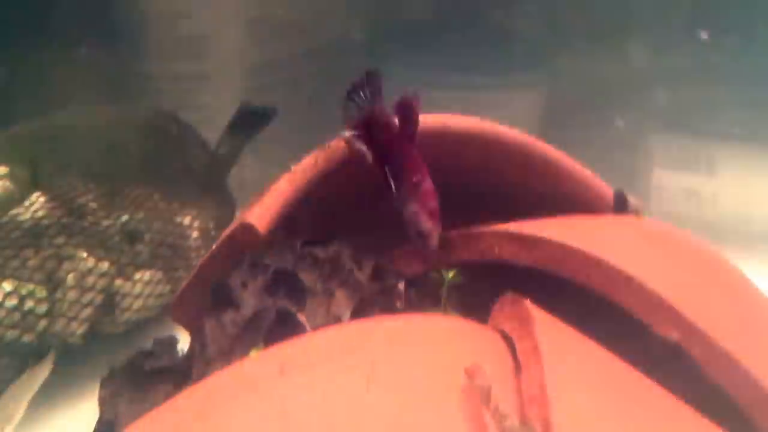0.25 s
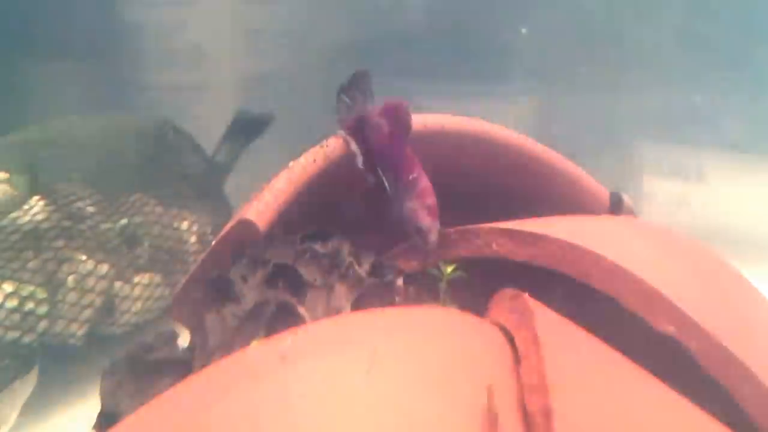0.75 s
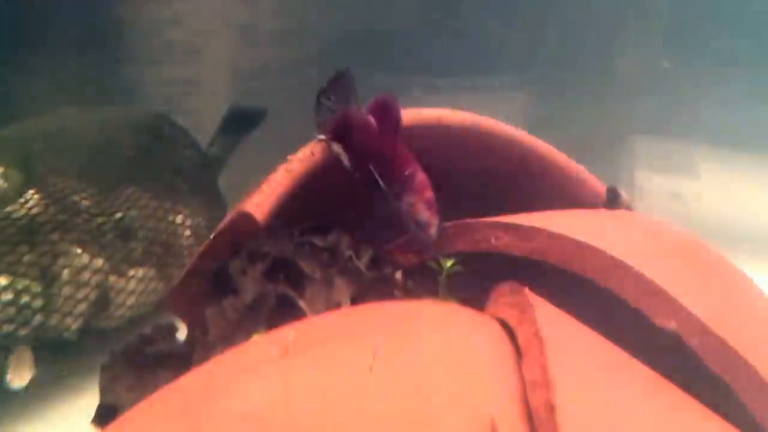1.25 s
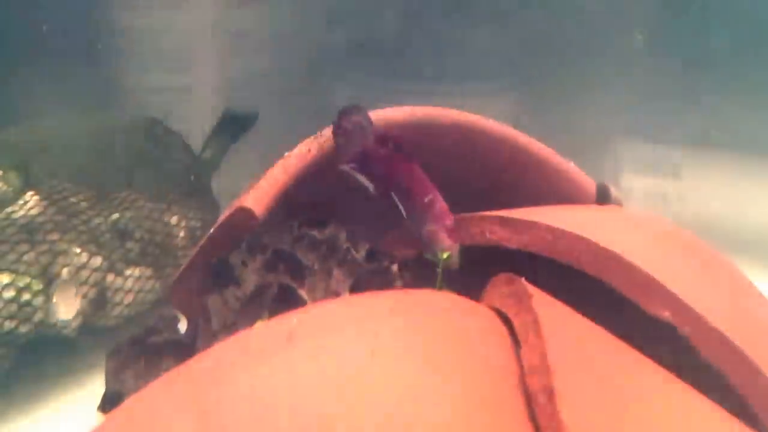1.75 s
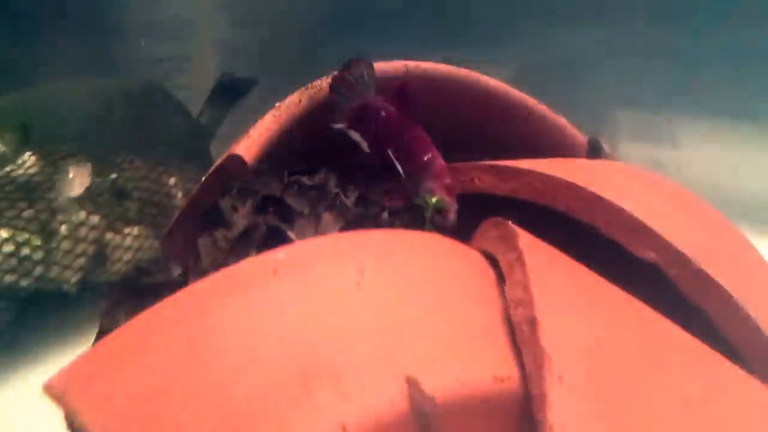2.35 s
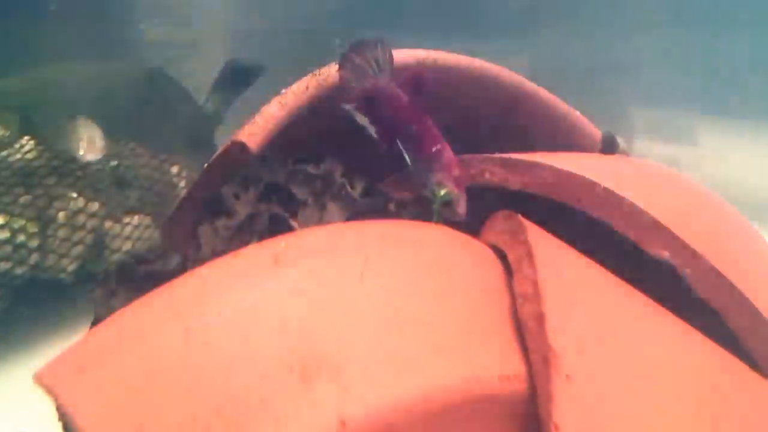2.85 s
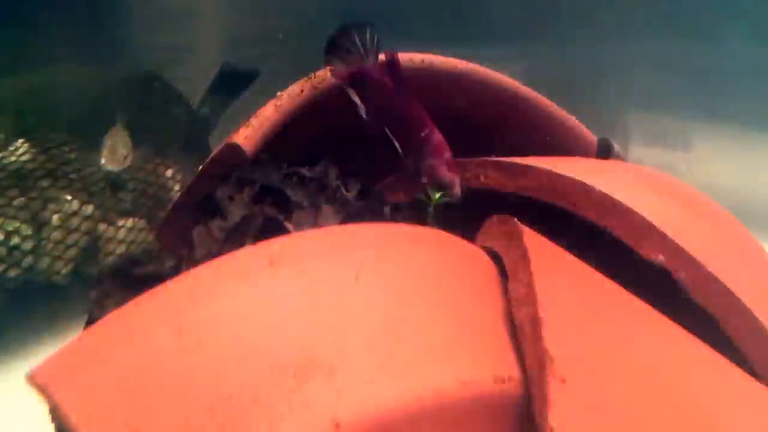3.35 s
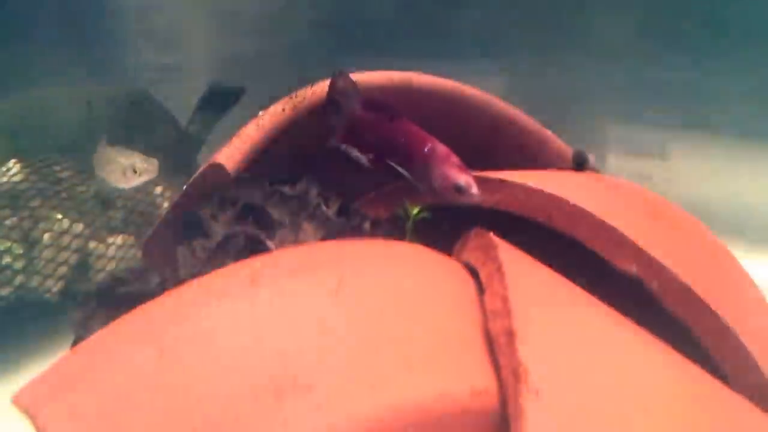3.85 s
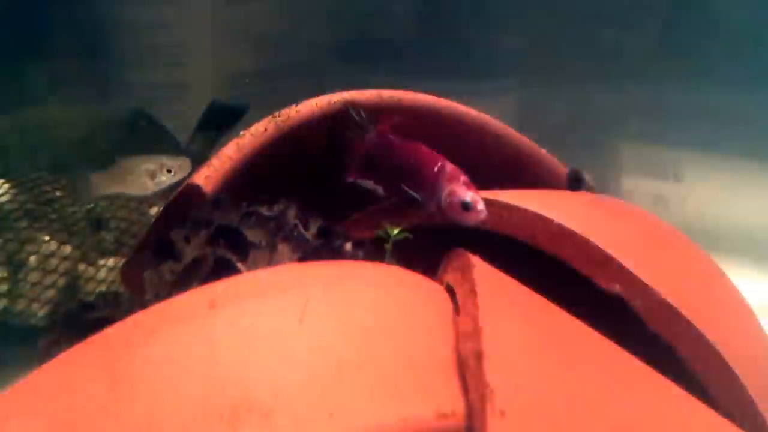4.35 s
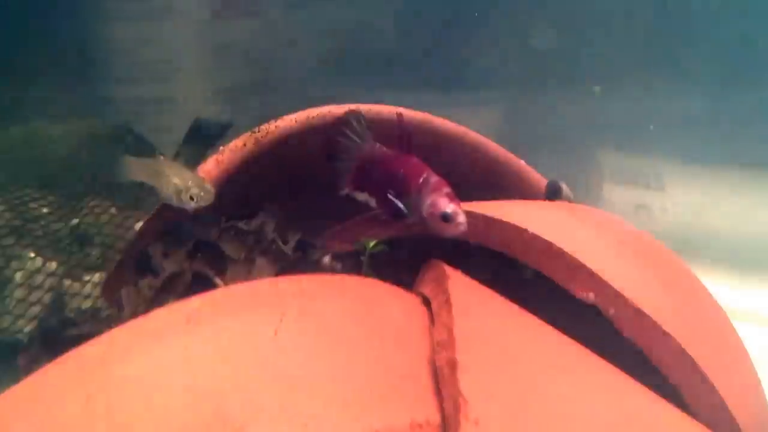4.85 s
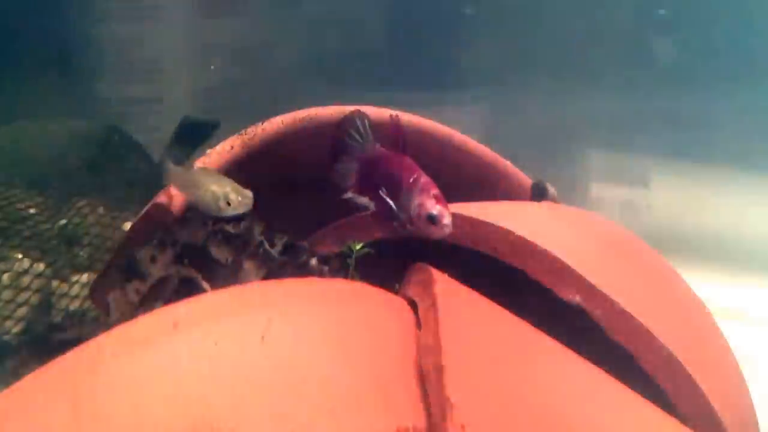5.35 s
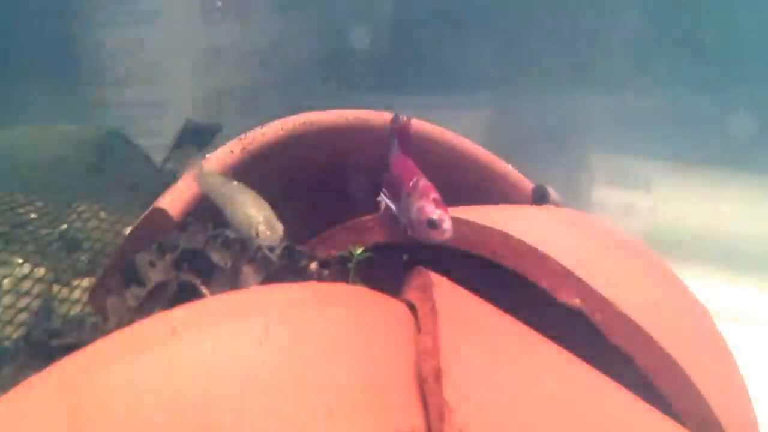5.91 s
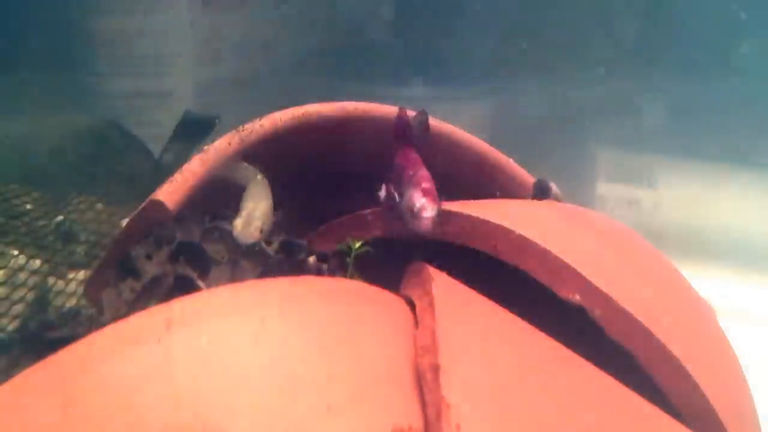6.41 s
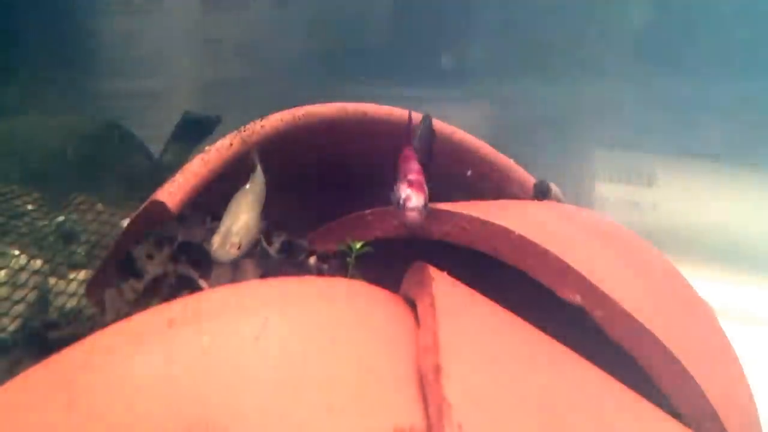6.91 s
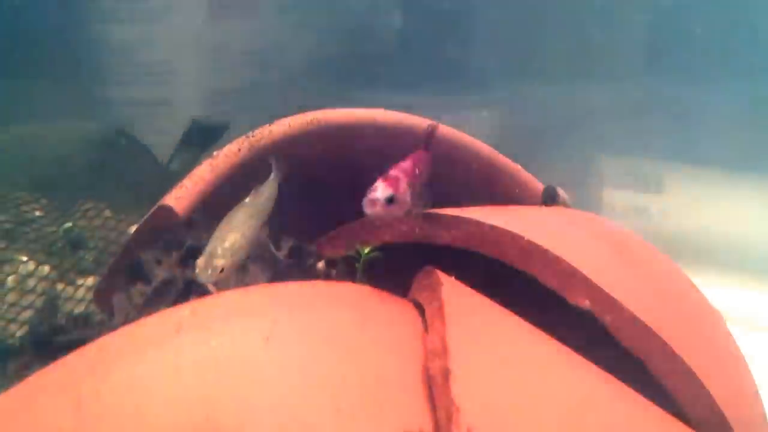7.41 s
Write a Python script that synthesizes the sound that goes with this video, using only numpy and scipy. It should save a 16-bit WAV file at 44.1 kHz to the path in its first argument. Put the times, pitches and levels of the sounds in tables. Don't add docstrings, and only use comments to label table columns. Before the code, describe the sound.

A fish tank in a quiet room, heard close to the glass. From 0 s to the end at about 7.6 s, an air pump gives a deep, steady mains-like hum with a thin buzz above it. Air rising through the water makes a low, uneven rumble and gurgle, surrounded by a soft wash and very faint high fizz. Bubble plops start at about 0.2 s, mostly low and round, some higher, scattered irregularly. The valve's bright rattle flutters about six times a second, fairly even at first, then abruptly throbs more strongly from 2.3 s. Tiny bursts of hissing spray come and go. Several plops crowd together near 5.1 s. Around 6 s the throb flattens into a steadier buzz, then pulses more clearly again from about 7 s, with a few faint high plops near 7.2 to 7.4 s. The hum never stops.

```python
import sys
import numpy as np
from scipy import signal
from scipy.fft import rfft, irfft, next_fast_len
from scipy.io import wavfile
from scipy.ndimage import uniform_filter1d

SR = 44100
rng = np.random.default_rng(int(sys.argv[2]) if len(sys.argv) > 2 else 0)


def dump_mix(stems):
    frames = np.atleast_2d(stems).T
    limited = np.clip(frames, -1, 1)
    pcm = np.round(limited * 32767).astype(np.int16)
    wavfile.write(sys.argv[1], SR, pcm)


def boost_factor(decibels):
    exponent = np.asarray(decibels, float) / 20
    return 10 ** exponent


N = 338247

STROKE_HZ, FIRST_STROKE_S = 59.9936, .0065
# t/s, f/Hz, peak level/dB
PLOPS = [(0.232, 5800, -47), (0.529, 780, -45.5), (0.598, 1480, -44), (0.728, 2690, -48),
         (0.737, 1010, -41), (1.127, 885, -51), (1.709, 775, -51), (1.773, 815, -40), (1.988, 810, -44),
         (2.084, 996, -46), (3.171, 1080, -48), (3.248, 540, -47.3), (3.659, 1294, -42.5),
         (3.786, 2690, -50.5), (4.295, 4220, -49.5), (4.775, 1095, -41.5), (4.996, 570, -46.5),
         (5.094, 1693, -43.5), (5.101, 913, -48), (5.11, 1360, -47.5), (5.121, 2035, -45.5),
         (5.322, 3080, -49.5), (5.483, 855, -48), (6.013, 1860, -45.5), (6.321, 2030, -47.5),
         (6.71, 860, -58), (7.061, 826, -49), (7.196, 3290, -54), (7.339, 3270, -55), (7.408, 3200, -52)]


def housing_hum():
    # multiple of the stroke rate, rms level/dB
    hum_partials = [(1.0, -32.4), (2.0, -33.4), (3.0, -44.9), (4.0, -52.9), (5.0, -51.8), (6.0, -52.8),
                    (7.0, -70.9), (8.0, -61.7), (9.0, -68.8), (10.0, -57.7), (11.0, -69.8), (12.0, -81.3),
                    (13.0, -79.6), (14.0, -73.8), (15.0, -70.6), (16.0, -68.9), (17.0, -68.0),
                    (18.0, -73.9), (19.0, -78.6), (20.0, -62.3), (21.0, -70.8), (22.0, -77.7),
                    (23.0, -73.3), (24.0, -75.3), (25.0, -70.9), (26.0, -71.8), (27.0, -70.9),
                    (28.0, -65.5), (29.0, -76.0), (30.0, -68.8)]
    return boost_factor(-0.04) * harmonics(hum_partials, wander_db=0.4, wander_rad=0.027, rate_hz=0.62)


def harmonics(partials, wander_db, wander_rad, rate_hz):
    stroke_phase = 2 * np.pi * STROKE_HZ * (np.arange(N) / SR - FIRST_STROKE_S)
    out = np.zeros(N)
    for multiple, db in partials:
        start = rng.uniform(0, 2 * np.pi) * (multiple > 3)
        loose = np.sqrt(multiple)
        level = np.sqrt(2) * boost_factor(db + wander_db * loose * drift(rate_hz))
        phase = multiple * stroke_phase + start + wander_rad * loose * drift(rate_hz)
        out -= level * np.cos(phase)
    return out


def valve():
    # multiple of the stroke rate, rms level/dB
    buzz_partials = [(41.0, -79.1), (42.0, -77.5), (46.0, -77.3), (48.0, -73.3), (49.0, -75.6),
                     (51.0, -77.2), (52.0, -76.1), (56.0, -83.5), (58.0, -85.5), (59.0, -87.4),
                     (61.0, -82.8), (71.0, -81.4), (75.0, -78.1), (78.0, -79.3), (79.0, -72.9),
                     (80.0, -80.6), (81.0, -82.7), (83.0, -76.4), (86.0, -78.2), (87.0, -73.1),
                     (88.0, -74.7), (89.0, -73.8), (90.0, -77.3), (91.0, -80.7), (92.0, -75.9),
                     (94.0, -76.2), (95.0, -80.4), (96.0, -78.3), (97.0, -77.4), (98.0, -80.2)]
    # f/Hz, density level/(dB per Hz)
    rattle_spectrum = [(3500, -78), (4200, -7), (4700, -2.5), (5200, -1.5), (5800, -3.5), (6100, -11),
                       (7000, -31), (7600, -70)]
    # f/Hz, density level/(dB per Hz)
    clatter_spectrum = [(1800, -103), (2000, -93), (2400, -98), (3100, -98), (3600, -108), (4100, -104),
                        (4500, -112), (6000, -113), (7200, -112), (7900, -124)]

    beat = 1 + 0.054 * np.cos(4 * np.pi * STROKE_HZ * np.arange(N) / SR)
    habit = repeating(memory=40)
    slaps = swarm(1024, 2.5)
    slaps = slaps / slaps.std() + .45 * habit / habit.std()
    rattle = boost_factor(-89.5) * beat * patchy_noise(rattle_spectrum, 1.0, 23.0, 0.26, source=slaps)

    upper_partials = [row for row in buzz_partials if row[0] > 65]
    lower_partials = [row for row in buzz_partials if row[0] <= 65]
    upper = harmonics(upper_partials, wander_db=.2, wander_rad=.08, rate_hz=.4)
    lower = harmonics(lower_partials, wander_db=.3, wander_rad=.05, rate_hz=.3)
    clatter = patchy_noise(clatter_spectrum, .5, 2, .5, source=repeating(memory=60))
    return throbbing() * (rattle + boost_factor(1.0) * upper) + lower + clatter


def throbbing():
    # t/s, swell level over the steady rattle/dB, steady rattle level/dB
    looseness = [(0.0, -6, 1.5), (0.9, -2, -.5), (2.2, -3, -.5), (2.32, 15, -9.5), (2.7, 7, -5),
                 (3.45, 9, -5.5), (3.9, 3, -3.5), (5.4, 8, -5.5), (6.0, -1, -1), (6.7, -1, -.5),
                 (7.2, 6, -5), (7.67, 4, -2.5)]
    first_s, throbs_per_s, quicken_per_s2 = .042, 6.31, .035
    uneven_db, uneven_s = .7, .004

    clock = np.arange(N) / SR
    beats = np.arange(50)
    uneven = rng.standard_normal((len(beats), 2))
    throb_count = (throbs_per_s + .5 * quicken_per_s2 * (clock + first_s)) * (clock - first_s)
    throb_s = np.interp(beats, throb_count, clock)
    when, swell_db, steady_db = np.transpose(looseness)
    peak_db = np.interp(throb_s, when, swell_db) + uneven_db * uneven[:, 0]
    throb = 2 + swells(throb_s + uneven_s * uneven[:, 1], peak_db, rise_s=.026, fall_s=.030)
    throb = throb * boost_factor(np.interp(clock, when, steady_db))
    return throb / np.sqrt(np.mean(throb ** 2))


def repeating(memory):
    stroke = round(SR / STROKE_HZ)
    fresh = rng.standard_normal((N // stroke + 200, stroke))
    strokes = signal.lfilter([1], [1, 1 / memory - 1], fresh, axis=0)
    return strokes[150:].ravel()[:N]


def rumble():
    # f/Hz, density level/(dB per Hz)
    shudder_spectrum = [(15, -74), (30, -78), (45, -71), (60, -66.5), (90, -67), (120, -61.5), (145, -70.5),
                        (190, -87)]
    # f/Hz, density level/(dB per Hz)
    glass_spectrum = [(120, -91), (155, -64), (200, -60.5), (235, -64), (270, -61.5), (310, -66),
                      (350, -68), (420, -86.5)]
    gain = boost_factor(1.32 * air_flow_db() + 1.28 * drift(2.1))
    return patchy_noise(shudder_spectrum, .8, 5, .1) + gain * patchy_noise(glass_spectrum, 1.0, 21, 1.0)


def gurgle():
    # f/Hz, density level/(dB per Hz)
    gurgle_spectrum = [(300, -86.5), (360, -70), (420, -78), (480, -80), (550, -81.5), (680, -89),
                       (900, -100)]
    low_plops = [(s, db) for s, hz, db in PLOPS if hz < 1150]
    when, pocket_db = np.transpose(low_plops)
    pockets = 1 + swells(when, pocket_db + 39.5, rise_s=.025, fall_s=.025)
    gain = pockets * boost_factor(0.61 * air_flow_db() + 3.0 * drift(3.4))
    return gain * patchy_noise(gurgle_spectrum, 1.2, 8.6, 0.82, source=swarm(2048, 2.4))


def air_flow_db():
    # t/s, level/dB
    flow = [(0.0, -39), (1.26, -42.5), (1.32, -38), (1.98, -42), (3.1, -40), (3.14, -35.5), (3.18, -41),
            (4.51, -41.5), (5.0, -43.5), (5.23, -37.5), (5.79, -42.5), (5.92, -38), (6.58, -43.5),
            (6.81, -38), (7.11, -42.5), (7.24, -39.5), (7.46, -42), (7.67, -37.5)]
    s, db = np.transpose(flow)
    return np.interp(np.arange(N) / SR, s, db - db.mean())


def bubbles():
    climb_hz_s = 3000
    out = np.zeros(N)
    clusters = rng.standard_normal((len(PLOPS), 9, 3))
    for (s, hz, db), mates in zip(PLOPS, clusters):
        add_bubble(out, s - .003, hz, db - hz / 1200, climb_hz_s, .010)
        for late, detune, size in mates:
            mate_hz = hz + (110 + .06 * hz) * detune
            mate_db = db - 6.5 - hz / 1500 + 2.5 * size
            add_bubble(out, s + .016 * late, mate_hz, mate_db, 2000, .006)
    for when, pitch, size in rng.random((30, 3)):
        add_bubble(out, when * N / SR, 2000 * 3.2 ** pitch, -58 - 4 * pitch - 6 * size, climb_hz_s, .010)
    for when, pitch, size, climb in rng.random((1500, 4)):
        hz = 400 * 10 ** pitch
        db = -58 - 15 * np.log10(hz / 1000) - 12 * size
        add_bubble(out, when * N / SR, hz, db, 4000 * climb, .010)
    return out


def add_bubble(out, s, hz, db, rise_hz_s, length_s):
    lag = np.arange(-int(2 * length_s * SR), int(5 * length_s * SR))
    lag_s = lag / SR
    shape = np.exp(-.5 * (lag_s / np.where(lag < 0, .5 * length_s, length_s)) ** 2)
    tone = boost_factor(db) * shape * np.sin(2 * np.pi * (hz + .5 * rise_hz_s * lag_s) * lag_s)
    i = int(s * SR) + lag
    keep = (i >= 0) & (i < N)
    out[i[keep]] += tone[keep]


def wash():
    # f/Hz, density level/(dB per Hz)
    wash_spectrum = [(400, -100), (700, -93.5), (950, -85), (1150, -81.5), (1500, -83.5), (1800, -86.5),
                     (2100, -88), (2550, -93.5), (3000, -91), (3300, -95.5), (3600, -101), (4150, -93),
                     (4800, -108), (6500, -117)]
    return patchy_noise(wash_spectrum, 2.0, 5.4, 0.04, source=swarm(1024, 3.7))


def spray():
    # t/s, level/dB, centre f/Hz
    bursts = [(0.231, -70, 7430), (0.653, -69, 8740), (0.8, -67.8, 12830), (1.506, -67.1, 9900),
              (1.667, -66, 10880), (2.485, -69.1, 12830), (2.556, -67.7, 8650), (2.85, -64, 10100),
              (3.204, -66, 12800), (3.42, -65, 12720), (3.939, -65, 10360), (4.209, -65, 10400),
              (4.435, -64, 8970), (4.667, -63, 11460), (4.841, -69, 9970), (5.014, -64, 9350),
              (5.243, -66, 12800), (5.376, -66.6, 8890), (5.61, -61.5, 8060), (5.748, -71, 11200),
              (5.898, -66.8, 10440), (6.073, -66, 11040), (6.351, -70, 9840), (6.447, -66, 10240),
              (6.565, -67, 9730), (6.846, -64, 11000), (7.2, -66, 10400), (7.392, -65, 13810),
              (7.519, -61.5, 8750)]
    out = np.zeros(N)
    droplets = rng.standard_normal((len(bursts), 130, 3))
    for (s, db, hz), burst in zip(bursts, droplets):
        for late, detune, size in burst:
            pitch_hz = np.clip(hz * (1 + 0.17 * detune), 6000, 18000)
            add_bubble(out, s - .02 + 0.031 * abs(late), pitch_hz, db - 11.3 + 3.8 * size, 6000, .004)
    for when, pitch, size in rng.random((2500, 3)):
        add_bubble(out, when * N / SR, 6200 + 9400 * pitch, -80 - 10 * size, 3000, .008)
    return out


def fizz():
    # f/Hz, density level/(dB per Hz)
    fizz_spectrum = [(5000, -112), (6500, -105), (7100, -104), (7800, -109), (8800, -105), (9600, -107),
                     (10400, -110), (11400, -106), (12300, -108), (13300, -107), (14400, -110),
                     (15800, -110)]
    return patchy_noise(fizz_spectrum, 1.3, 10.0, 0.25, source=swarm(1024, 2.8))


def swarm(cell, uneven_db):
    cells = signal.stft(rng.standard_normal(N + cell), nperseg=cell)[2]
    sizes = rng.exponential(1, cells.shape)
    sizes = uniform_filter1d(uniform_filter1d(sizes, size=2, axis=0), size=2, axis=1)
    gain = boost_factor(uneven_db * np.minimum(sizes / sizes.std(), 5))
    return signal.istft(cells * gain, nperseg=cell)[1][:N]


def patchy_noise(spectrum, patchy_db, rate_hz, shared, source=None):
    size = next_fast_len(N)
    source = rng.standard_normal(N) if source is None else source / source.std()
    octave = np.log2(np.maximum(np.arange(size // 2 + 1) * SR / size, 1))
    hz, db = np.transpose(spectrum)
    colour_db = np.interp(octave, np.log2(hz), db, left=-200, right=-200)
    tinted = rfft(source, size) * boost_factor(colour_db) * np.sqrt(SR / 2)
    together = drift(rate_hz)
    out = np.zeros(N)
    for centre in np.arange(np.log2(hz[0]), np.log2(hz[-1]) + 1 / 3, 1 / 3):
        band = np.clip(1 - 3 * np.abs(octave - centre), 0, 1)
        flicker = boost_factor(patchy_db * (drift(rate_hz) + shared * together))
        out += irfft(tinted * band, size)[:N] * flicker
    return out


def swells(times, dbs, rise_s, fall_s):
    out = np.zeros(N)
    for s, db in zip(times, dbs):
        i = np.arange(max(int((s - .2) * SR), 0), min(int((s + .2) * SR), N))
        lag = i / SR - s
        out[i] += boost_factor(db) * np.exp(-.5 * (lag / np.where(lag < 0, rise_s, fall_s)) ** 2)
    return out


def drift(rate_hz):
    r = np.exp(-80 * np.pi * rate_hz / SR)
    slow = signal.lfilter([1], [1, -2 * r, r * r], rng.standard_normal(N // 40 + 4002))[4000:]
    return np.interp(np.arange(N) / 40, np.arange(len(slow)), (slow - slow.mean()) / slow.std())


def scene():
    pump = housing_hum() + valve()
    water = rumble() + gurgle() + bubbles() + wash() + spray() + fizz()
    return (pump + water)[None, :]


def band_limit(x):
    return signal.sosfilt(signal.butter(12, 15800, fs=SR, output="sos"), x)


def record(dry):
    return band_limit(dry)


dry = scene()
out = record(dry)
dump_mix(out)
```